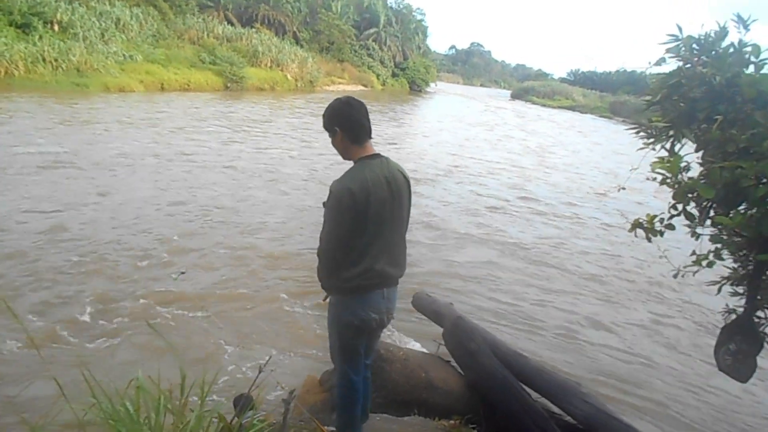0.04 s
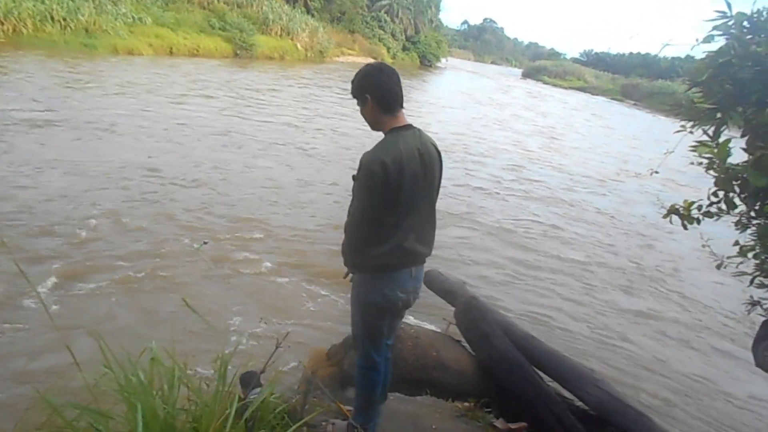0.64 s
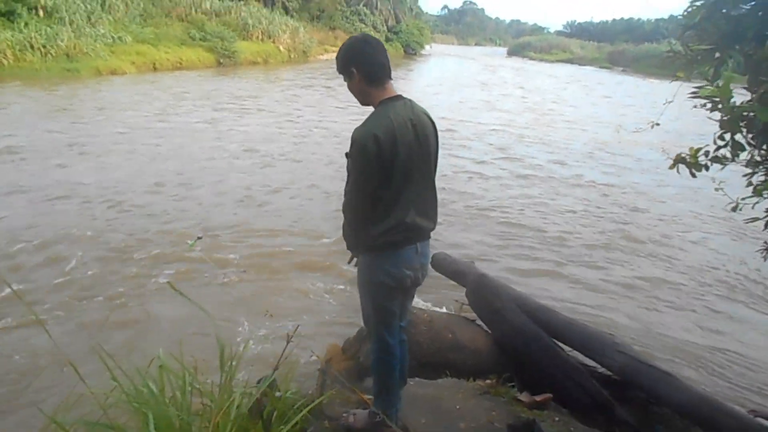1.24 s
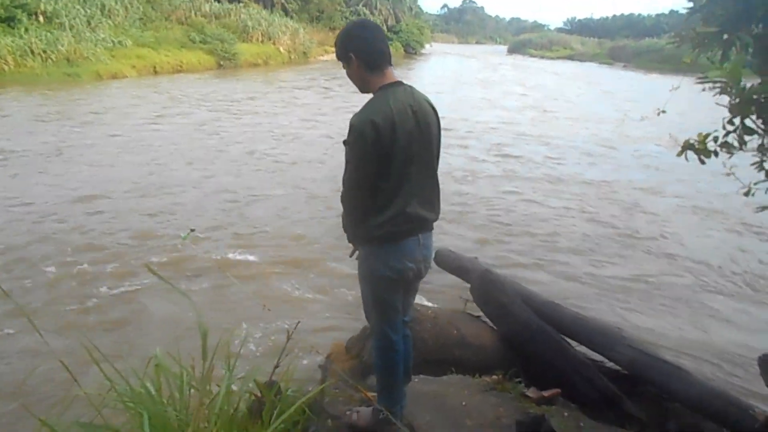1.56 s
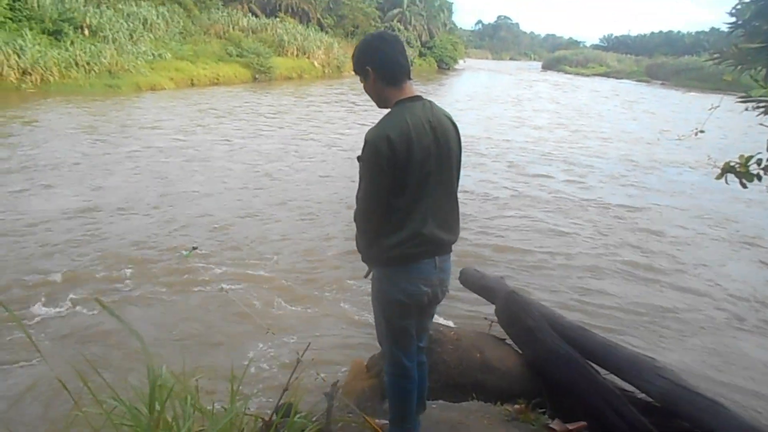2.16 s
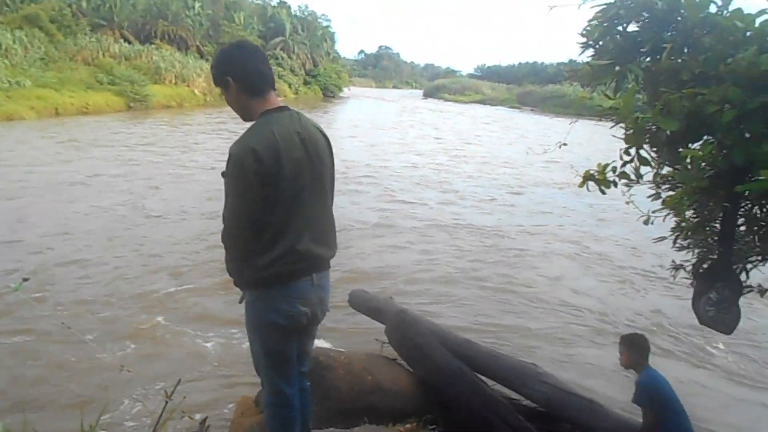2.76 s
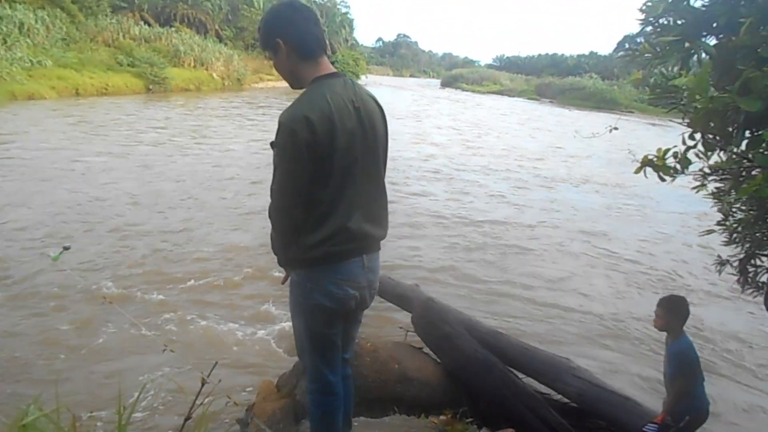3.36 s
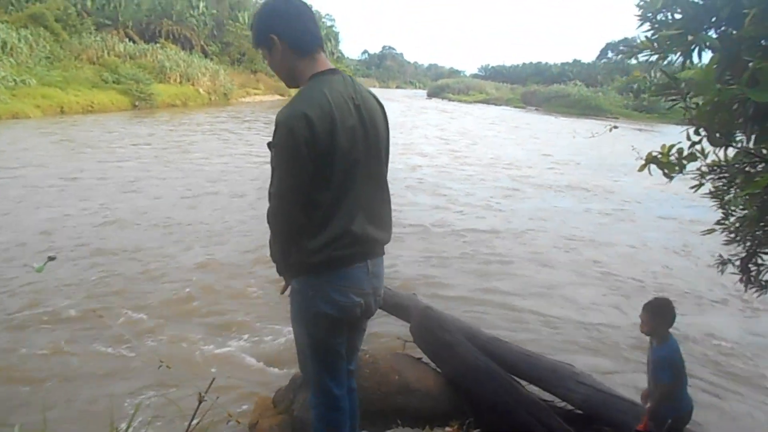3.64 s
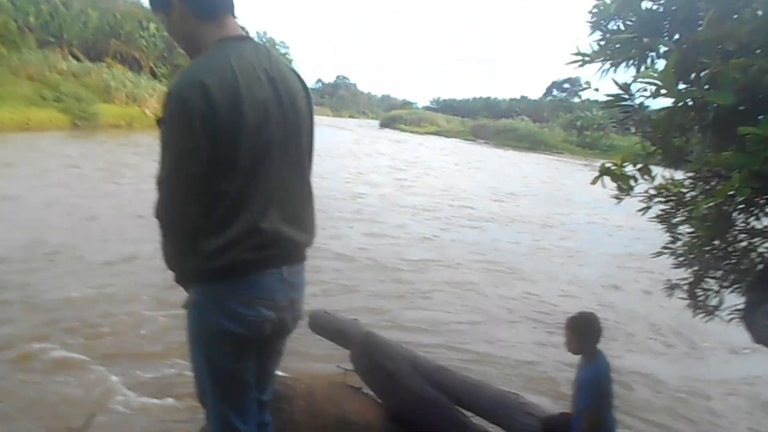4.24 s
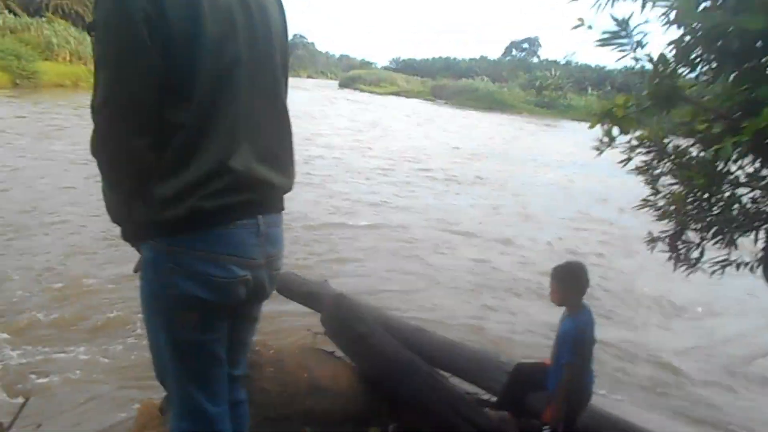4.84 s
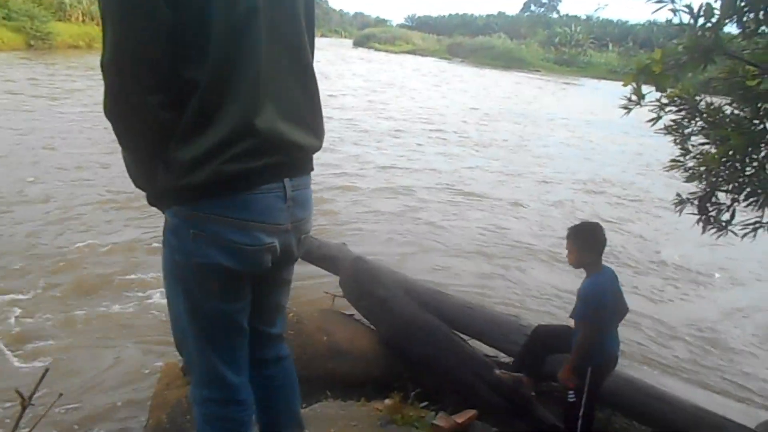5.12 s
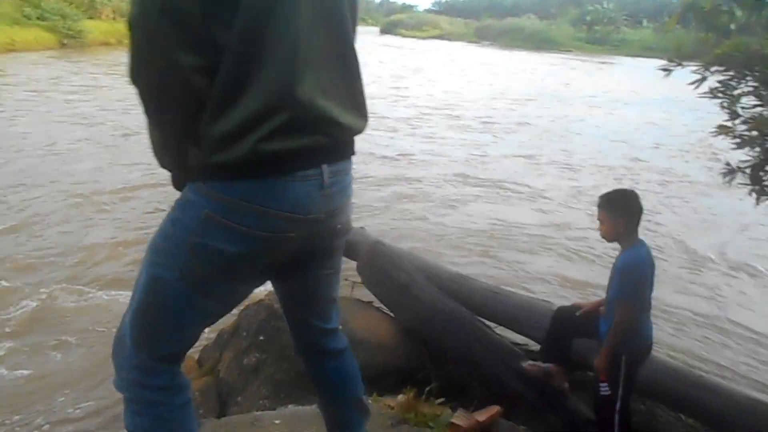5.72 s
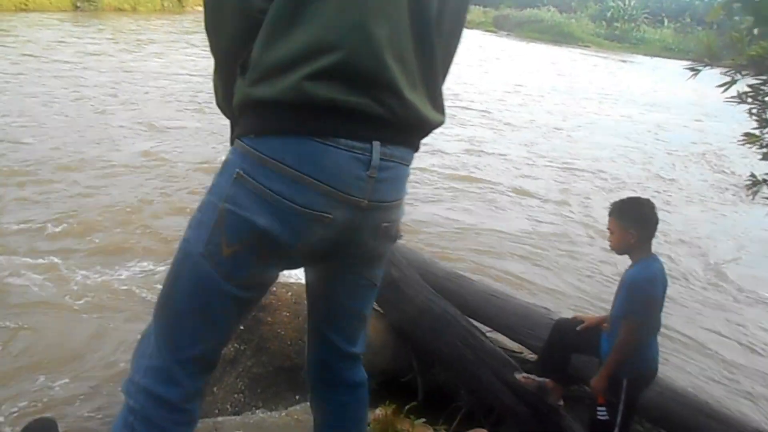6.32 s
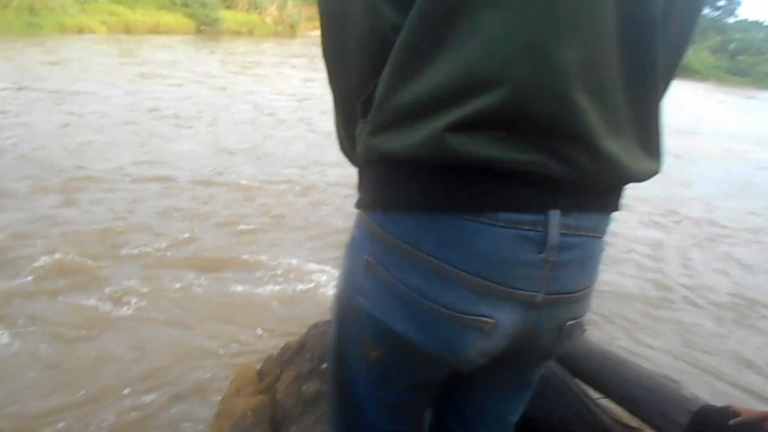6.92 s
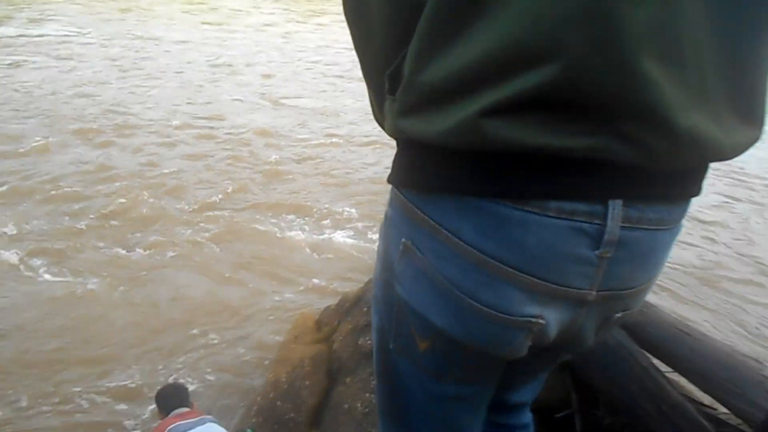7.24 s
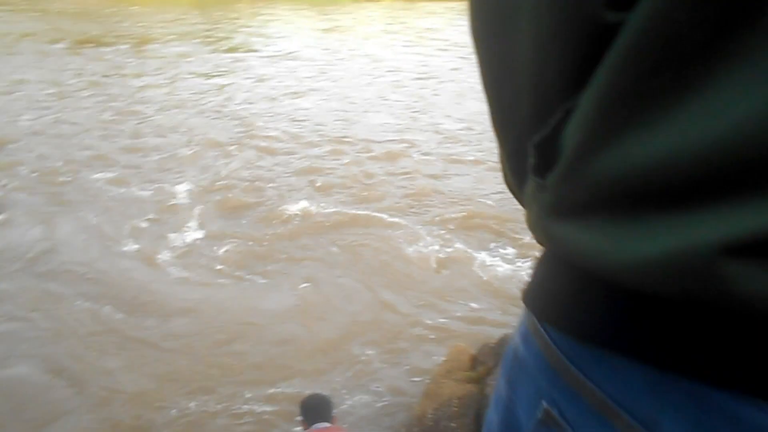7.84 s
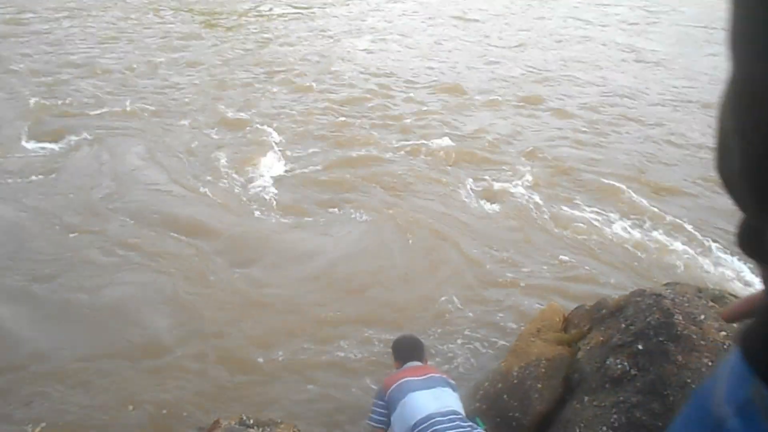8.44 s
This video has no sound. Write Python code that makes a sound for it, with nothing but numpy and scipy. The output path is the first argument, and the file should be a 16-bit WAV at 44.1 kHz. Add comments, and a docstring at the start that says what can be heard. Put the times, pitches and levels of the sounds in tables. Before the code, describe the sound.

Steady rushing river water with bubbling, foam hiss and low churning, dotted by little plops and microphone handling ticks.

```python
"""A wide muddy river rushes past a rocky bank, heard through one small hand-held microphone.
From the start the current roars and gurgles and foam fizzes; splashes, plops and handling ticks stand out.
At 3.4 s the sharpest tick ducks the limiter. Around 4 s waves build and collapse in the near riffle.
From 4 to 6 s the microphone turns down toward the rocks and faint wind puffs brush it.
After that the low churning over the rocks is at its loudest."""
import sys
import numpy as np
from scipy import signal
from scipy.fft import rfft, irfft
from scipy.io import wavfile

SR = 44100
rng = np.random.default_rng(int(sys.argv[2]) if len(sys.argv) > 2 else 0)


def inscribe(sig):
    """Save sig as 16-bit PCM at rate SR to the path in sys.argv[1].

    A 1-D sig is mono; a 2-D sig holds one channel per row.
    Samples are clipped to [-1, 1] before scaling.
    """
    pcm = np.round(np.clip(np.atleast_2d(sig).T, -1, 1) * 32767)
    wavfile.write(sys.argv[1], SR, pcm.astype(np.int16))


N = 382788
TIME = np.arange(N) / SR


def gain_of(db):
    """dB to amplitude."""
    return 10 ** (np.asarray(db) / 20)


def unit_rms(x):
    """Scales to rms 1."""
    return x / np.sqrt(np.mean(x ** 2) + 1e-20)


def envelope(rows):
    """Rows of t/s, level/dB to a gain per sample."""
    return gain_of(np.interp(TIME, *np.transpose(rows)))


def decay(t, t60_s):
    """Exponential fall, 60 dB in t60_s."""
    return np.exp(-np.log(1000) * t / t60_s)


def add(mix, start_s, sound):
    """Mixes a sound in at start_s."""
    part = mix[max(round(start_s * SR), 0):][:len(sound)]
    part += sound[:len(part)]


def coloured(x, spectrum):
    """Filters x by rows of f/Hz, level/dB on a log frequency axis; rms 1."""
    hz, db = np.transpose(spectrum)
    bin_db = np.interp(np.log(np.fft.rfftfreq(N, 1 / SR) + 1), np.log(hz + 1), db)
    return unit_rms(irfft(rfft(x) * gain_of(bin_db), N))


def swell(low_hz, high_hz, count=30):
    """Slow random rise and fall; rms 1."""
    t = TIME[::100]
    rates_hz = np.geomspace(low_hz, high_hz, count)
    waves = sum(np.sin(2 * np.pi * (hz * t + rng.random())) / np.sqrt(hz) for hz in rates_hz)
    return np.interp(TIME, t, unit_rms(waves))


def impulses(per_s, spread_db, cap=5.5):
    """Randomly timed impulses: many small, a few large."""
    size = gain_of(spread_db * np.minimum(rng.exponential(1, N), cap))
    return size * rng.choice([-1, 1], N) * (rng.random(N) < per_s / SR)


def turbulence(patch_db, flicker_db, patch_frames, patch_bins):
    """Noise that swells in time-frequency patches and flickers as a whole where wavelets break."""
    frames = N // 128 + 5
    real, imag, patches = rng.standard_normal((3, frames, 257))
    kernel = np.outer(np.hanning(patch_frames), np.hanning(patch_bins))
    patches = unit_rms(signal.fftconvolve(patches, kernel, "same"))
    flicker = unit_rms(signal.lfilter([1], [1, -.9], rng.standard_normal(frames)))
    stft = (real + 1j * imag) * gain_of(patch_db * patches + flicker_db * flicker[:, None])
    return unit_rms(signal.istft(stft.T, nperseg=512, noverlap=384)[1][:N])


def bubble(hz, t60_s, rise=0.11, onset_cycles=0.68):
    """Trapped air rings down, its pitch rising as it nears the surface."""
    t = np.arange(int(t60_s * SR) + 2) / SR
    phase = 2 * np.pi * hz * t * (1 + rise * t / (2 * t60_s))
    onset = 1 - np.exp(-t * hz / onset_cycles)
    return np.sin(phase) * decay(t, t60_s) * onset


def bubble_cloud(low_hz, high_hz, per_s, cycles, spread_db, count):
    """Bubbles of many sizes, about even power per Hz; rms 1."""
    out = np.zeros(N)
    for hz in np.geomspace(low_hz, high_hz, count) * rng.uniform(.98, 1.02, count):
        births = impulses(per_s / count, spread_db)
        out += hz * signal.oaconvolve(births, bubble(hz, cycles / hz))[:N]
    return unit_rms(out)


def hum(hz=61.4, db=-65):
    """Very faint steady tone."""
    return gain_of(db) * np.sin(2 * np.pi * hz * TIME)


def wind_puffs():
    """Soft puffs of wind thud on the microphone."""
    # puffs: centre t/s, level/dB, half-length/s
    gusts = [(4.2, -56, .2), (4.85, -52, 0.18), (5.65, -53, 0.22)]
    thud_spectrum = [(10, -6), (28, 0), (60, -18), (200, -30), (1000, -70)]  # f/Hz, level/dB
    gain = np.zeros(N)
    for s, db, half_s in gusts:
        add(gain, s - half_s, gain_of(db) * np.hanning(int(2 * half_s * SR)))
    return gain * coloured(rng.standard_normal(N), thud_spectrum)


def handling_ticks(snap_t60_s=0.0017, scatter_t60_s=0.021, scatter_db=-13):
    """Handling the microphone: a very short snap, then a little scatter."""
    # ticks: t/s, peak/dB, f/Hz
    ticks = [(0.2734, -5, 6470), (0.7637, -6, 9570), (1.3778, -11, 9220), (2.1204, -6, 8220),
             (3.3184, -9, 4140), (3.3638, 3.5, 9300), (3.4794, -5, 9440), (3.5984, -7, 6710),
             (4.6694, -9, 8490), (7.1462, -5, 8120), (7.4394, -2, 9800), (7.9294, -2, 9110),
             (8.4364, -2.5, 9130)]
    out, t = np.zeros(N), np.arange(SR // 50) / SR
    treble = signal.butter(2, [4500, 13500], "band", fs=SR, output="sos")
    for s, db, hz in ticks:
        snap = np.cos(2 * np.pi * hz * t) * decay(t, snap_t60_s)
        scatter = rng.standard_normal(len(t)) * decay(t, scatter_t60_s)
        tick = signal.sosfilt(treble, snap + gain_of(scatter_db) * scatter)
        add(out, s, gain_of(db) * tick / abs(tick).max())
    return out


def plops():
    """Single large bubbles ring near the bank."""
    # bubbles: t/s, peak/dB, f/Hz, t60/s
    large_bubbles = [(1.11, -21, 700, .07), (1.750, -22, 1610, .025), (1.753, -21.5, 757, 0.045),
                     (2.385, -26, 805, 0.07), (2.615, -20, 806, 0.11), (3.035, -18, 703, 0.074),
                     (4.958, -11.5, 1750, .018), (4.976, -18, 720, .06)]
    out = np.zeros(N)
    for s, db, hz, t60_s in large_bubbles:
        ring = bubble(hz, t60_s)
        add(out, s, gain_of(db) * ring / abs(ring).max())
    return out


def splashes():
    """Short showers of droplets, each a noise band around one pitch."""
    # showers: centre t/s, level/dB, half-length/s, centre f/Hz, sigma/octaves
    showers = [(0.473, -21, 0.0099, 4300, .2), (1.376, -22, .016, 10000, .35),
               (2.305, -17, 0.036, 10200, 0.33), (2.311, -19.5, .036, 3500, 0.65),
               (2.474, -18.5, 0.0092, 4600, 0.55), (2.626, -19, 0.012, 3950, .2),
               (2.657, -24, .01, 3780, .14), (3.82, -21.5, 0.035, 4300, 0.35),
               (4.045, -23, 0.075, 4400, 0.7), (4.665, -22, 0.019, 9000, .5),
               (7.4185, -13, 0.0022, 4200, .8), (7.428, -22, .022, 10200, .35), (7.81, -25, .04, 2000, .45),
               (8.105, -24, 0.02, 4050, .11), (8.287, -26, 0.035, 3700, .09), (8.44, -22, 0.041, 10200, .3)]
    out = np.zeros(N)
    for s, db, half_s, centre_hz, sigma_oct in showers:
        size = int(2 * half_s * SR)
        hz = np.fft.rfftfreq(size, 1 / SR) + 1
        band = np.exp(-.5 * (np.log2(hz / centre_hz) / sigma_oct) ** 2)
        shower = unit_rms(irfft(rfft(rng.standard_normal(size)) * band, size))
        add(out, s - half_s, gain_of(db) * shower * np.hanning(size))
    return out


def churning(trim_db=-3.0):
    """Water folds over the rocks with a low, lumpy roar."""
    # roar drift: t/s, level before trim/dB
    drift = [(0, -36.5), (.9, -40), (1.8, -39.5), (2.5, -40), (3.7, -41), (4.2, -38), (4.9, -38),
             (5.4, -38.5), (6.2, -36.5), (6.8, -34), (7.5, -33.5), (8.2, -37.5), (8.68, -38)]
    # roar spectrum: f/Hz, relative level/dB
    spectrum = [(30, -35), (90, -22.5), (150, -12.5), (220, -4.5), (320, 0.5), (430, -1), (600, -24),
                (1500, -46)]
    roar = coloured(turbulence(patch_db=2.5, flicker_db=0.9, patch_frames=24, patch_bins=5), spectrum)
    return gain_of(trim_db) * envelope(drift) * roar


def surging(collapse_s=0.056):
    """Gain that drives the foam: each wave builds to its crest, then collapses."""
    # riffle waves: crest t/s, drive rise/dB, build-up/s
    waves = [(3.82, 5, .3), (4.08, 7.5, 0.68), (4.24, 5, 0.081), (4.66, 5.5, 0.34)]
    rises_db = [db * np.interp(TIME, [s - build_s, s, s + collapse_s], [0, 1, 0])
                for s, db, build_s in waves]
    return gain_of(np.max(rises_db, axis=0))


def foam(trim_db=-1.02, hiss_exponent=0.75, spray_exponent=0.89):
    """Froth hisses, bubbles burst and spray falls in the near riffle; a surge throws more spray."""
    # foam drift: t/s, level before trim/dB
    drift = [(0, -24), (1.1, -23.5), (1.7, -24), (2.2, -22), (2.8, -24.5), (3.3, -22.5), (4.8, -23.5),
             (5.8, -25.5), (6.9, -22), (7.6, -22), (8.68, -21)]
    # froth spectrum: f/Hz, relative level/dB
    hiss_spectrum = [(300, -39), (1200, 3), (2200, 2.5), (3200, 2.5), (4700, 4), (5300, 1), (6700, 2.5),
                     (7600, -1.5), (9700, 1.5), (12600, -6.5), (13600, -5.5), (16000, -6.5)]
    # droplet spectrum: f/Hz, relative level/dB
    spray_spectrum = [(1500, -22.5), (4000, -13.5), (7000, -2.5), (9600, 0.5), (12600, 1.5), (13800, -5.5),
                      (16000, -18)]
    froth = turbulence(patch_db=1.3, flicker_db=1.44, patch_frames=16, patch_bins=40)
    hiss = gain_of(-1.5) * coloured(froth, hiss_spectrum)
    spray = gain_of(-6.0) * coloured(impulses(per_s=2200, spread_db=4.0, cap=4.0), spray_spectrum)
    fizz = gain_of(-5.0) * bubble_cloud(3000, 10500, per_s=1800, cycles=10, spread_db=3.2, count=20)
    surge = surging()
    riffle = surge ** hiss_exponent * hiss + surge ** spray_exponent * (spray + fizz)
    return gain_of(trim_db) * envelope(drift) * riffle


def lapping(swell_db=1.6, gulp_sigma_s=0.018):
    """Gain that drives the current: wavelets lap, and some fold over and gulp air."""
    # gulps: centre t/s, drive rise/dB
    gulps = [(.3, 4), (.7, 4), (1.57, 7), (2.75, 3), (3.3, 7.5), (6.55, 2), (7.35, 6), (8.52, 7.5)]
    gulps_db = sum(db * np.exp(-.5 * ((TIME - s) / gulp_sigma_s) ** 2) for s, db in gulps)
    return gain_of(swell_db * swell(low_hz=2.5, high_hz=14) + gulps_db)


def current(turn_s=(3.95, 6.2), reference_db=-22.5, rush_exponent=0.26, gurgle_exponent=1.23):
    """Turbulent rush and gurgling bubbles; the colour shifts as the microphone turns to the rocks."""
    # current drift: t/s, level/dB (unity gain at reference_db)
    drift = [(0, -22.5), (2, -22), (3.7, -22.5), (4.4, -24), (5, -23.5), (5.7, -24.5), (6.6, -20),
             (8.1, -21.5), (8.68, -20)]
    # rush spectrum before the turn: f/Hz, relative level/dB
    far_spectrum = [(20, -25), (45, -20), (110, -23.5), (250, -35), (470, -8), (580, -1.5), (720, 0),
                    (950, -3), (1250, -2), (1480, -7), (1750, -4.5), (4500, -8), (7500, -12), (16000, -33)]
    # rush spectrum after the turn: f/Hz, relative level/dB
    near_spectrum = [(20, -16), (45, -34), (110, -22), (250, -16.5), (520, -5), (720, -1.5), (1030, -1),
                     (1480, -6), (1900, -3.5), (2400, -6), (3300, -5.5), (5200, -10.5), (8000, -13.5),
                     (16000, -34)]
    turn = np.interp(TIME, turn_s, [0, 1])
    far, near = np.sqrt(1 - turn), np.sqrt(turn)
    water = turbulence(patch_db=1.34, flicker_db=0.26, patch_frames=16, patch_bins=9)
    water += gain_of(-12.0) * bubble_cloud(561, 4870, per_s=1000, cycles=20, spread_db=3.0, count=32)
    rush = gain_of(-25.0) * (far * coloured(water, far_spectrum) + near * coloured(water, near_spectrum))
    far_gurgle = bubble_cloud(602, 1040, per_s=55, cycles=26, spread_db=1.5, count=18)
    near_gurgle = bubble_cloud(820, 1170, per_s=90, cycles=28, spread_db=2.0, count=18)
    gurgle = gain_of(-37.0) * (far * far_gurgle + near * near_gurgle)
    lap = lapping()
    # lapping traps air, so the gurgle rises more than the rush
    flow = lap ** rush_exponent * rush + lap ** gurgle_exponent * gurgle
    return envelope(drift) / gain_of(reference_db) * flow


def limiter(x, ceiling_db=-.5, recovery_db_per_s=7):
    """A peak over the ceiling cuts the gain at once; recovery is slow."""
    peak_db = 20 * np.log10(abs(x).max(0) + 1e-9)
    over_db = np.maximum(peak_db - ceiling_db, 0)
    recovery_db = recovery_db_per_s * TIME
    cut_db = np.maximum.accumulate(over_db + recovery_db) - recovery_db
    return x / gain_of(cut_db)


def scene():
    """Water, ticks, wind and hum, alike in both channels."""
    mono = current() + churning() + foam() + splashes() + handling_ticks() + plops() + wind_puffs() + hum()
    return np.array([mono, mono])


def record(dry):
    """The microphone's narrow treble notch, then limiter and low-pass."""
    notch_hz, half_width_hz, floor_db = 11030, 690, -15
    detune = 1j * (np.fft.rfftfreq(N, 1 / SR) - notch_hz) / half_width_hz
    notch = (gain_of(floor_db) + detune) / (1 + detune)
    limited = limiter(irfft(rfft(dry) * notch, N))
    lowpass = signal.firwin(1023, cutoff=15730, window=("kaiser", 9), fs=SR)
    return signal.oaconvolve(limited, lowpass[None], "same")


dry = scene()
out = record(dry)
inscribe(out)
```